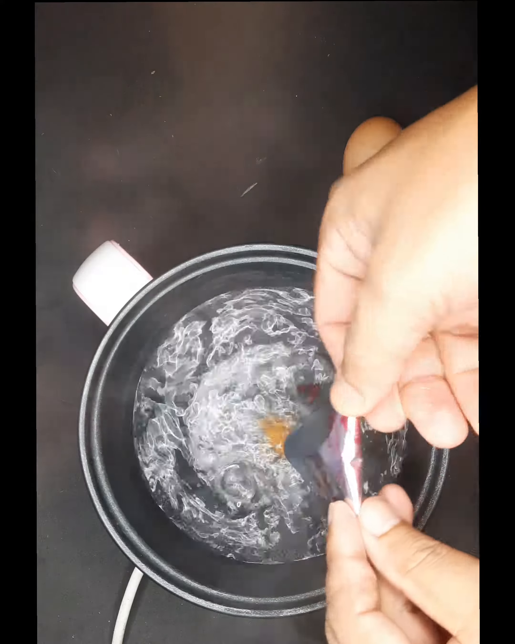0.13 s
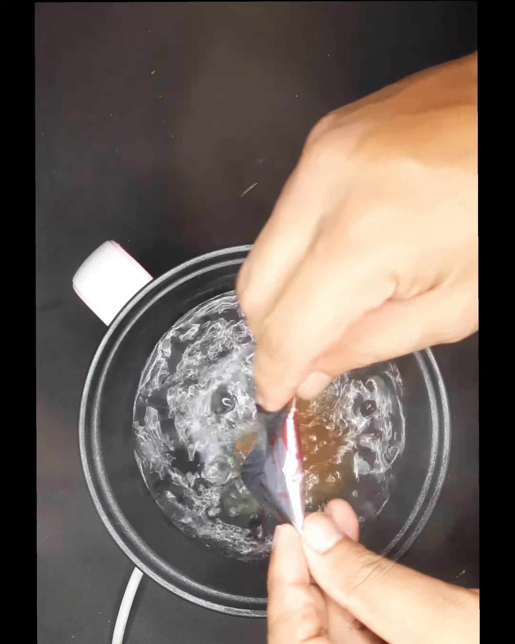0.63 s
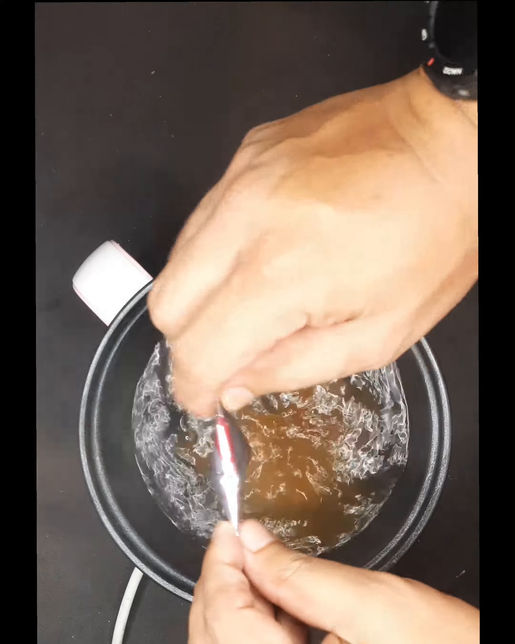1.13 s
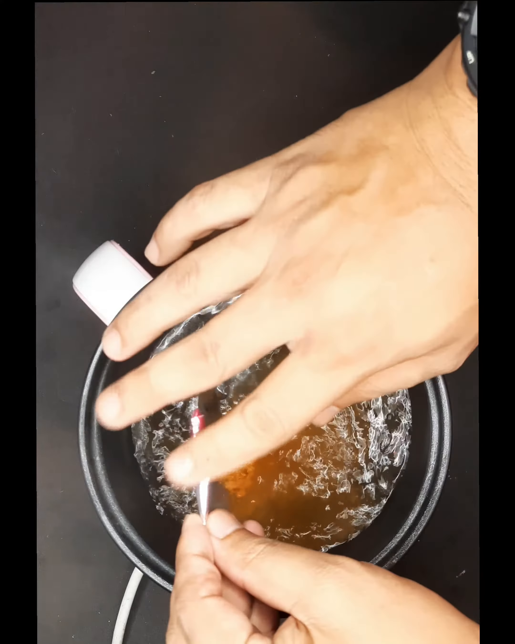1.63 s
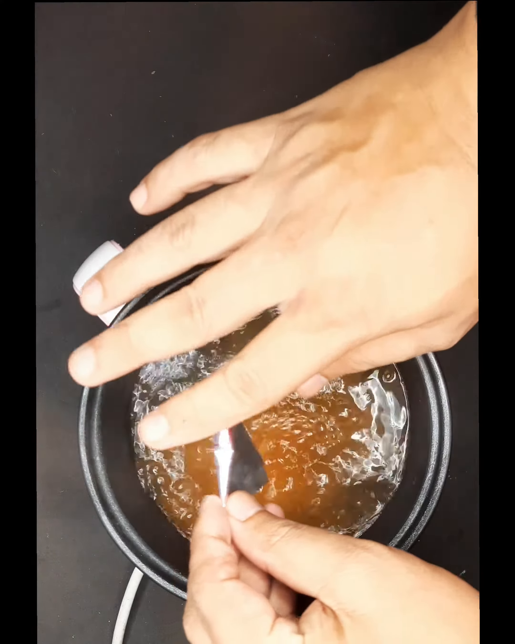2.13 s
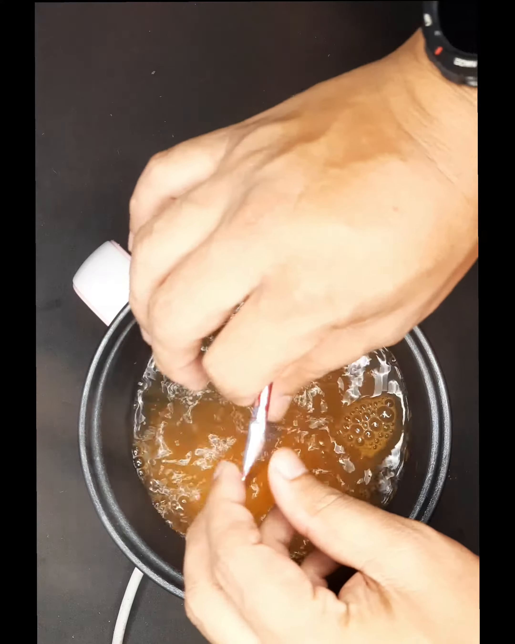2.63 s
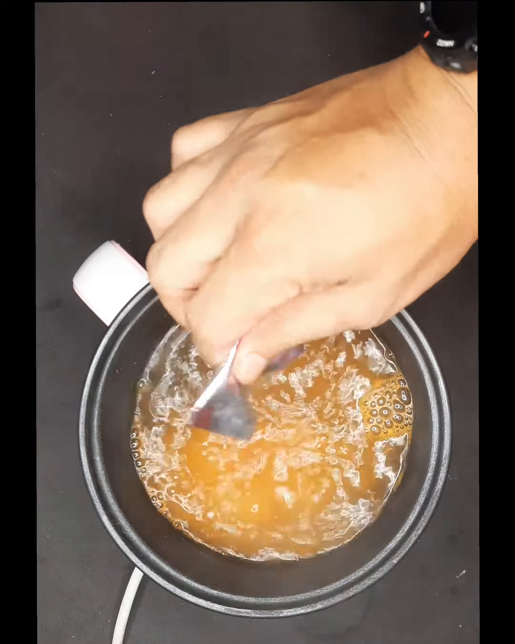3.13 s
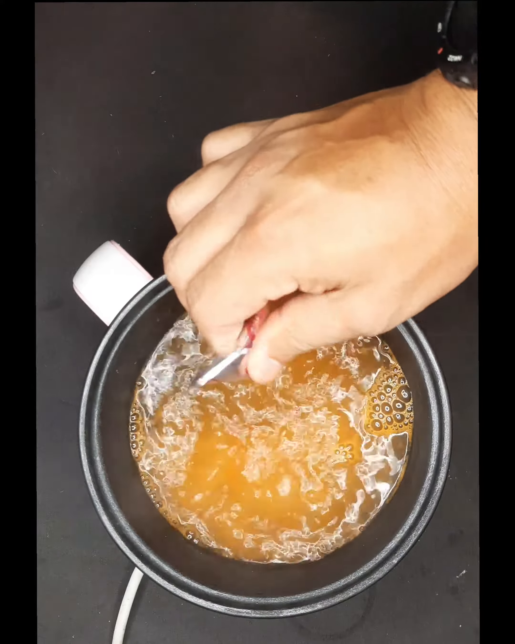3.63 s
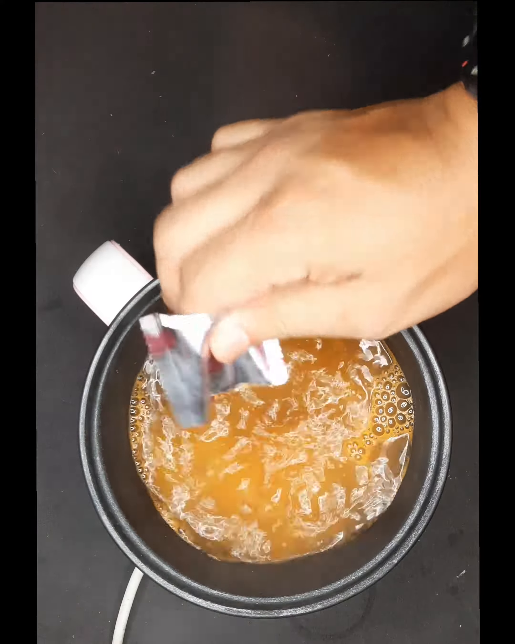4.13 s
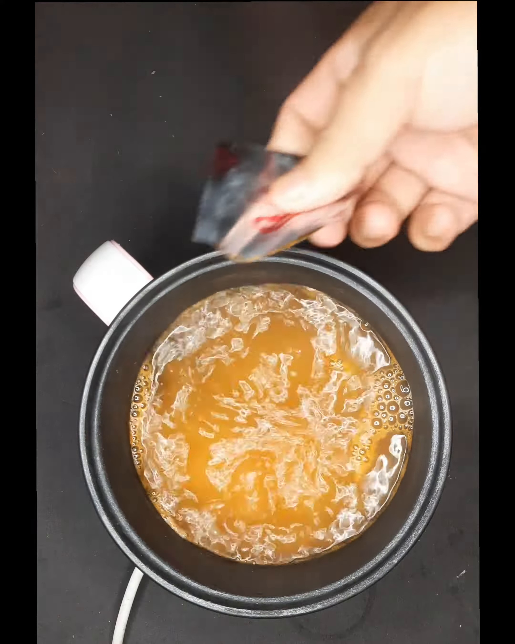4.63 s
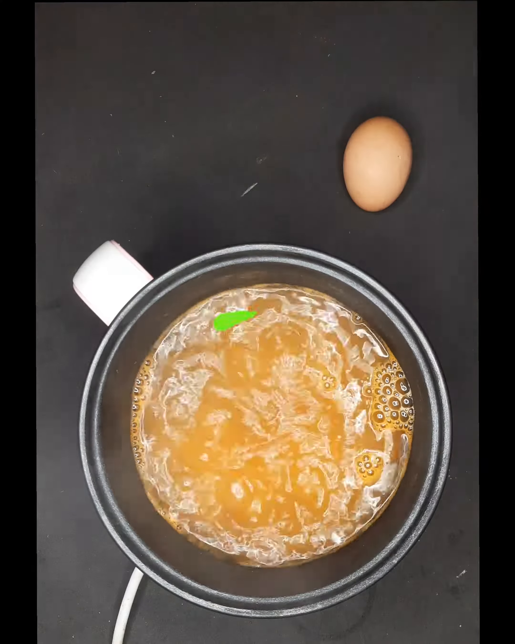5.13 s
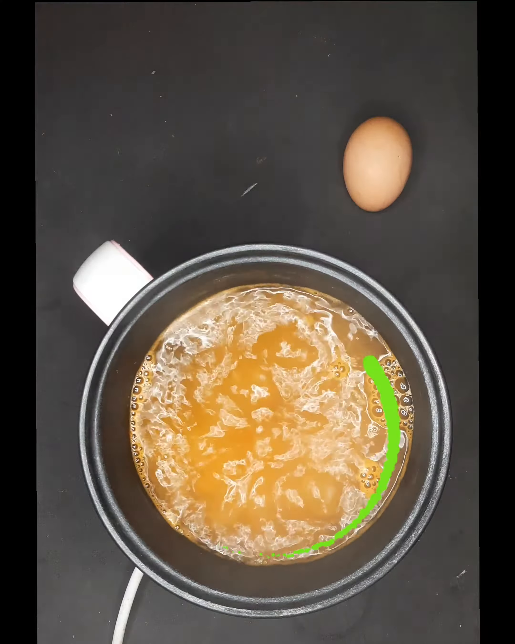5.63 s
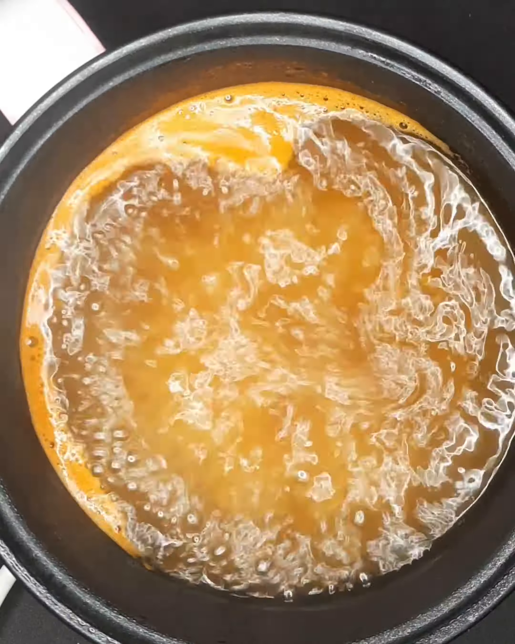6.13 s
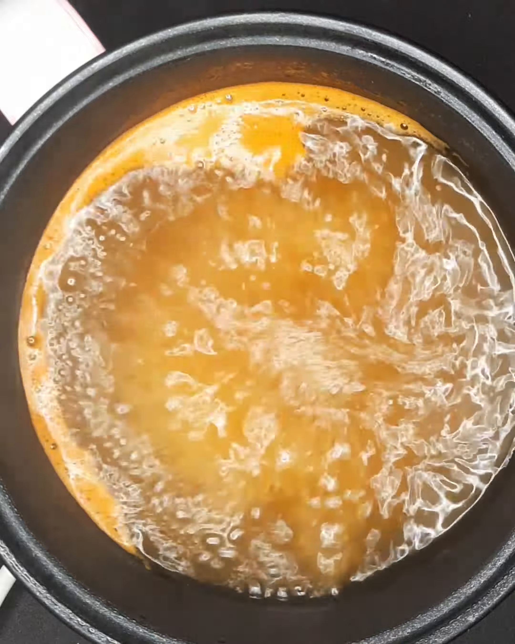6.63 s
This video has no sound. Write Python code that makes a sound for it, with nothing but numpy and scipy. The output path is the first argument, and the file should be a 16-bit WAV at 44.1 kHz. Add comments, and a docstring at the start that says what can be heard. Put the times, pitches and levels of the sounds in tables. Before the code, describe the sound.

A small pot of water boils throughout, close and dry in a kitchen: a soft broad seethe, low hum, small rounded plops and occasional hollow pops. For the first 0.6 seconds it is nearly alone. Light foil snaps then begin, gathering into duller, grainy shakes of a full sachet from 1.2 to 2.1 seconds. A sharp squeeze comes near 2.5, and from 2.7 to 3.9 the foil crackles densely, bright and loud, with hollow pops beneath and low steam puffs buffeting left and right. Further crisp bursts come at about 4.2 and 4.5, then the foil stops. Bubbling continues with only faint ticks until 5.96. Complete silence lasts about a tenth of a second. From 6.07 to the end near 6.8 the boil returns, with finer, nearer foil rustling toward the left, peaking around 6.45 and 6.6, and a few soft puffs.

```python
"""A foil sachet is shaken, squeezed and crinkled above a small electric pot of boiling water.
Foil: noise bursts for single snaps, plus a dense click crackle gated by each squeeze.
Pot: seething noise, resonances struck by collapsing bubbles, damped sines for hollow pops and plops, low hum.
Steam buffets the two microphone ports as low-frequency noise puffs.
After a short silence the microphone is nearer and more foil rustles at the left."""
import sys
import numpy as np
from scipy import signal
from scipy.fft import rfft, irfft, next_fast_len
from scipy.io import wavfile
from scipy.ndimage import uniform_filter1d, map_coordinates

SR = 44100
rng = np.random.default_rng(int(sys.argv[2]) if len(sys.argv) > 2 else 0)


def nominal_scale(level):
    """Amplitude ratio for a level in decibels (scalar or array-like)."""
    x = np.asarray(level, float) / 20
    return 10 ** x


def digitize_waveform(pressure):
    """Quantize a signal to 16-bit integers and store it at the path in sys.argv[1].

    Rows of a 2-D input are taken as channels; values are limited to [-1, 1].
    """
    field = np.atleast_2d(pressure).T
    bounded = np.clip(field, -1, 1)
    quanta = np.round(bounded * 32767).astype(np.int16)
    wavfile.write(sys.argv[1], SR, quanta)


N = 298116

# dropout: start_s, end_s
SILENCE_S = (5.957, 6.071)
# boiling wash in 250-1200 Hz, one list each side of the silence: time_s, level_db
BOIL_LEVEL = [
    [(0.0, -50), (5.74, -50.5), (5.99, -47)],
    [(6.05, -51.5), (6.28, -51.5), (6.76, -47)],
]
# spectrum of the wash: freq_hz, density_db_per_hz
SEETHE_SPECTRUM = [(21, -28), (35, -19.5), (65, -9), (111, -12.5), (136, -19.5), (171, -12), (245, -17),
                   (342, -4.5), (379, -11.5), (840, -19.5), (1300, -20), (2220, -19), (2650, -26),
                   (3600, -30.5), (4700, -34.5), (7200, -34.5), (9000, -42.5), (14800, -42.5),
                   (16000, -61.5)]
# resonances of pot and water, before the room: freq_hz, width_hz, level_db
POT_MODES = [(102.7, 4.8, -58), (344.8, 10, -60.5), (658, 370, -76), (860, 133, -53.5)]
# low hollow pops near the pot's air resonance, from bubbles or set off by foil snaps,
# before the room: time_s, level_db, start_pitch_hz
HOLLOW_POPS = [(1.61, -29, 604), (2.019, -25.5, 820), (2.407, -24.5, 860), (2.608, -27, 800),
               (2.72, -28, 513), (2.84, -36, 890), (2.93, -23.5, 880), (3.082, -30, 882),
               (3.145, -24.5, 860), (3.205, -26, 794), (3.267, -24, 850), (3.321, -23.5, 935),
               (3.415, -28, 930), (3.462, -18.5, 890), (3.519, -22.5, 895), (4.659, -25.5, 770),
               (5.351, -29.5, 844), (5.447, -29, 786), (5.618, -29, 750)]
# wavering low tones: freq_hz, mid_level_db
HUM_TONES = [(59.2, -54.5), (168, -57)]
# steam puffs on the ports: time_s, left_db, right_db, half_span_ms
STEAM_PUFFS = [(2.052, -57, -29.5, 24), (2.093, -32, -29.5, 36), (2.205, -57, -32, 49),
               (2.35, -35, -40.5, 39), (2.439, -32, -58, 32), (2.479, -29, -53, 13),
               (2.522, -24, -47.5, 18), (2.6, -35.5, -38, 37), (2.663, -39.5, -32.5, 21),
               (2.698, -36, -24.5, 95), (2.763, -30.5, -26, 17), (2.812, -54.5, -16.5, 62),
               (2.874, -48, -27.5, 14), (2.915, -30.5, -29.5, 40), (3.36, -40, -34, 51),
               (4.441, -54, -36.5, 65), (4.563, -42, -30, 30), (6.348, -41, -45, 90),
               (6.414, -32, -39.5, 19), (6.537, -52.5, -35, 22), (6.656, -30.5, -31, 26)]
# spectrum of a puff: freq_hz, density_db_per_hz
PUFF_SPECTRUM = [(30, -9), (80, 0), (150, -11), (230, -19), (400, -49)]
# foil creases that snap: time_s, level_db, body_over_level_db, top_over_level_db
FOIL_SNAPS = [(0.6545, -40, 1.5, -6.5), (0.6895, -49, -2, -7), (0.714, -41.5, -6, -5),
              (0.958, -43.5, -2, -4), (0.968, -46.5, 1, 0), (1.0851, -49, 10, -3), (1.104, -47, 2, 0.5),
              (1.159, -39, -2.5, -7), (1.174, -43, -3, -8), (1.275, -50.5, 11.5, -9), (1.3, -35.5, 3, -4),
              (1.323, -37, -3, -19), (1.424, -41.5, 1, 2.5), (1.45, -31.5, -17, -8), (1.474, -44, -2.5, -9),
              (1.55, -45, 2, -2), (1.566, -37, 9.5, 3.5), (1.5809, -31, 8, 7), (1.6, -34.5, -8, -6),
              (1.625, -46, -13, 4.5), (1.679, -48.5, 0, -13), (1.693, -45.5, 10, -9), (1.707, -45, 1, -6),
              (1.775, -50.5, 1, -2), (1.784, -40, 6.5, 1), (1.809, -39, 2, -1), (1.879, -44, -10, -9),
              (1.8884, -31, -20, -7.5), (1.9278, -30.5, -2, -17), (1.965, -29, -13, -4.5),
              (2.035, -48.5, -11, -10.5), (2.111, -46.5, -2, -11), (2.12, -43, -10, 6.5),
              (2.477, -33.5, -4, -5.5), (2.4843, -49, -15, 4.5), (2.5442, -28, -8.5, -16),
              (2.594, -43, -2, -3.5), (2.659, -37, 7, 1), (2.685, -39, 5.5, -1.5), (2.6981, -38, 0.5, 9),
              (2.737, -38, 2, -1), (2.786, -45.5, 3.5, -4), (2.8, -39, 2, -5.5), (2.8163, -35, 7.5, 8),
              (2.833, -35, 1, 0), (2.843, -28.5, -9, -1), (2.859, -31, 2, 6.5), (2.8726, -27, -11, 6.5),
              (2.882, -27, -6.5, 8), (2.9095, -28.5, -26, -1.5), (2.954, -26.5, -2, 5.5),
              (2.9913, -26.5, -12.5, -3), (2.9966, -33, -23, 8), (3.009, -24, 0, 0), (3.0227, -35, 9, 5),
              (3.055, -33.5, -3.5, 16.5), (3.0642, -32, 1.5, -3), (3.078, -23, -3.5, 7),
              (3.123, -38, -12.5, 7), (3.14, -27, -2.5, -2), (3.168, -38.5, 0.5, -4.5),
              (3.184, -26.5, -8.5, 3.5), (3.203, -26, -10, 7.5), (3.207, -21, -21, 3),
              (3.226, -22, -18, -6), (3.228, -22, -25.5, 3.5), (3.237, -23.5, -15.5, 2.5),
              (3.2685, -28.5, 3.5, -0.5), (3.301, -36, -1, -5), (3.3242, -30.5, 0.5, 2),
              (3.334, -30, -7.5, 2.5), (3.383, -39, 4.5, -4.5), (3.4047, -38.5, -3, 3),
              (3.415, -36, 0.5, 2.5), (3.425, -36, 8, 0.5), (3.4336, -30.5, 4.5, 8.5),
              (3.442, -27, -14.5, 3), (3.447, -27.5, -9, 8), (3.463, -33.5, -2, 16),
              (3.4796, -29, -3, 10.5), (3.504, -41, 12, 4), (3.517, -36, 2.5, 10), (3.5407, -31, -13, 3),
              (3.5533, -32, -1, 4), (3.5586, -25, 4.5, -6), (3.566, -27.5, -4, -0.5), (3.577, -27, -12, 7),
              (3.582, -23, -13, -3), (3.595, -25, -19, 3), (3.6074, -29.5, -7, 3), (3.622, -38.5, -8, 1),
              (3.642, -45, -12, -5), (3.668, -38.5, -25, 5), (3.7038, -33, -3, -0.5), (3.71, -27, -4, 2.5),
              (3.7329, -26.5, 4.5, 3), (3.75, -27.5, -5.5, -10), (3.789, -27, -6, 4.5),
              (3.8358, -36, -0.5, 11.5), (3.851, -34, -2, 0.5), (3.8692, -34, -9, 5),
              (3.9035, -30.5, -15, -1), (3.909, -26, -9, -3), (3.937, -35.5, -26, 11),
              (4.1199, -32.5, 0, 2.5), (4.147, -32.5, 1.5, 6), (4.157, -38.5, -20, -3.5),
              (4.1848, -31, -7, -2), (4.1917, -22, -23, 5.5), (4.224, -30, -11, 4.5),
              (4.2414, -35.5, 0, 0.5), (4.2863, -47, -12, -6), (4.416, -34.5, -31, -36),
              (4.431, -32.5, -13.5, -32), (4.442, -36, -10, -15), (4.4783, -23.5, -34, 4),
              (4.7985, -53.5, 4, 4), (4.857, -48.5, -15, -10), (5.087, -43.5, -12, 3.5),
              (5.338, -43, -9, -14), (5.359, -42.5, -14, 4.5), (5.4247, -46.5, -1, -19),
              (5.484, -44.5, 1, -12), (5.5368, -55, 12.5, -19), (6.107, -49.5, -1, 3),
              (6.1568, -44, 11, -8), (6.176, -47, 11.5, -8), (6.184, -35, -5, -13), (6.208, -40, -1, 1.5),
              (6.222, -43.5, 15, -2), (6.2432, -40.5, 12, 5), (6.2623, -43, -8, -4), (6.284, -36, 7.5, 3),
              (6.336, -35.5, 3, 2), (6.344, -33, -9, -2), (6.366, -35, -1, 1.5), (6.4067, -39, 2, 12),
              (6.436, -29, -19, 5.5), (6.519, -37, -3, -4), (6.5238, -40, 4, 4), (6.5648, -41, -16, 17),
              (6.573, -37.5, -2, 13), (6.589, -36.5, 9.5, 0), (6.63, -34, -8, -2.5),
              (6.6733, -28.5, -3.5, -12)]
# spectrum of the foil: freq_hz, density_db_per_hz
FOIL_SPECTRUM = [(350, -1.5), (600, -4.5), (894, 3), (1130, -1.5), (1680, -5.5), (2610, 2), (3430, -4),
                 (5480, 2), (7410, -3), (12500, -3.5), (15400, -6.5), (16300, -38.5)]
# spectrum of the nearer crackle: freq_hz, density_db_per_hz
NEAR_FOIL_SPECTRUM = [(350, 4), (800, -5.5), (1500, 1.5), (2680, 3), (5710, -0.5), (9620, -4),
                      (11200, -2.5), (15400, -9), (16000, -30)]
# shakes and squeezes of the sachet: peak_s, peak_db, length_ms (between points 20 dB down)
SACHET_SQUEEZES = [(1.17, -53.5, 250), (1.436, -40, 165), (1.577, -40.5, 149), (1.699, -38, 73),
                   (1.804, -39, 56), (1.895, -41, 99), (1.96, -43, 166), (2.485, -29, 47),
                   (2.544, -40.5, 117), (2.691, -39, 144), (2.833, -28, 163.5), (2.96, -29, 114),
                   (3.0, -35, 111), (3.078, -29, 130.5), (3.145, -34, 62), (3.219, -27, 120),
                   (3.327, -30.5, 132), (3.45, -30, 218), (3.591, -27.5, 113), (3.738, -32, 132),
                   (3.798, -28, 66.5), (3.855, -29, 57.5), (3.905, -31.5, 114.5), (4.189, -25.5, 87),
                   (4.239, -35.5, 66), (4.429, -57, 85), (4.481, -29.5, 54), (5.363, -50, 155),
                   (5.5, -52, 80)]
# how hard the nearer foil is worked: time_s, level_db
NEAR_FOIL_LEVEL = [(6.072, -45), (6.16, -54), (6.24, -39), (6.445, -31), (6.458, -42), (6.51, -49.5),
                   (6.53, -48.5), (6.6, -34.5), (6.673, -40), (6.7, -48.5), (6.76, -58)]
# dull part of the crackle, strongest while the sachet is full: time_s, gain_db
DULL_GAIN = [(0, 7), (2.2, 4.5), (2.6, 1), (4.6, -0.5), (6.76, 3.5)]
# likeness of left and right in the wash: freq_hz, correlation
PORT_LIKENESS = [(60, 0.57), (180, 0.96), (550, 0.77), (1650, -0.045), (4970, -0.035), (15000, -0.072)]
# colour of the two ports: freq_hz, left_over_right_db
PORT_COLOUR = [(60, 0), (180, 0), (550, 3), (1650, 3), (4970, -1), (15000, 7)]
# decay of the kitchen: freq_hz, t60_s
KITCHEN_DECAY = [(500, 0.096), (4000, 0.076), (14000, 0.056)]

SILENCE_FROM_S, SILENCE_TO_S = SILENCE_S
COLLAPSE_TOP_HZ = 2480  # pole frequency of a two-pole roll-off: collapse under water
PLOP_COUNT, PLOP_MEDIAN_HZ, PLOP_LOG_SPREAD = 180, 804, 0.15
PLOP_MEDIAN_DB, PLOP_SPREAD_DB = -44.5, 4.5
SNAP_MEDIAN_MS, NEAR_SNAP_MEDIAN_MS, SNAP_LOG_SPREAD = 3.75, 1.78, 0.13  # nominal length
SNAP_LEAD_S = 0.005  # bending before the crease gives
FULL_UNTIL_S, FULL_BODY_HZ = 2.3, (2300, 3060)  # full sachet: narrower body band
KNOCK_MEDIAN_DB, KNOCK_SPREAD_DB = -13.5, 4.2  # low knock of a snap, over its body
RISE_SHARE = 0.31  # part of a squeeze spent rising


def unit(x):
    """Scaled to rms 1."""
    return x / np.sqrt(np.mean(x ** 2) + 1e-20)


def along(points, hz):
    """(Hz, value) points interpolated on a log frequency axis."""
    f, v = np.transpose(points)
    return np.interp(np.log(hz + 1), np.log(f + 1), v)


def curve(rows, column, outside=-120):
    """One value per sample from one column of a table."""
    rows = np.array(rows)
    return np.interp(np.arange(N) / SR, rows[:, 0], rows[:, column], outside, outside)


def wobble(knots_per_s):
    """Smooth random curve."""
    knots = rng.standard_normal(int(N * knots_per_s / SR) + 4)
    return map_coordinates(knots, [np.arange(N) * knots_per_s / SR])


def filtered(x, response):
    """x times a complex response of frequency."""
    m = next_fast_len(N + 8192)
    return irfft(rfft(x, m) * response(np.fft.rfftfreq(m, 1 / SR)), m)[..., :N]


def pair(gain, patchy_db):
    """Stereo noise, mid rms 1, with time-frequency patches of random gain and set port likeness."""
    z = signal.stft(rng.standard_normal((2, N)), nperseg=512)[2]
    field = uniform_filter1d(rng.standard_normal(z.shape[1:]), size=4, axis=0)
    field = uniform_filter1d(field, size=8, axis=1)
    two = signal.istft(z * nominal_scale(patchy_db * unit(field)), nperseg=512)[1][:, :N]

    def split(hz):
        # cos(2 * angle) is the left-right correlation
        angle = np.arccos(np.clip(along(PORT_LIKENESS, hz), -1, 1)) / 2
        return gain(hz) * np.array([np.cos(angle), np.sin(angle)])

    mid, side = filtered(two, split)
    return np.array([mid + side, mid - side]) / np.sqrt(np.mean(mid ** 2))


def twin(count, alike):
    """Noise for the two ports, partly shared."""
    shared, left, right = rng.standard_normal((3, count))
    return np.sqrt(alike) * shared + np.sqrt(1 - alike) * np.array([left, right])


def grains(s, hz, cycles, size, rise, length):
    """Damped sines whose pitch rises as they die, summed at their times."""
    t = np.arange(length) / SR
    hz = hz[:, None]
    life = t * hz / cycles
    envelope = size[:, None] * np.exp(-life) * (1 - np.exp(-8 * life))
    wave = envelope * np.sin(2 * np.pi * hz * t * (1 + rise * life))
    at = (s * SR).astype(int)[:, None] + np.arange(length)
    return np.bincount(at.ravel(), wave.ravel(), N + length)[:N]


def room(x, delay_s, share_db):
    """Direct sound, later at the right port, plus wall decay that differs at each port."""
    hz, t, z = signal.stft(rng.standard_normal((2, SR // 3)), SR, nperseg=128)
    decay = nominal_scale(-60 * t / along(KITCHEN_DECAY, hz)[:, None])
    tail = signal.istft(z * decay, SR, nperseg=128)[1]
    wet = signal.fftconvolve(x, tail / np.linalg.norm(tail[0]), axes=1)[:, :N]
    direct = filtered(x, lambda f: np.exp(-2j * np.pi * f * [[0], [delay_s]]))
    return direct + nominal_scale(share_db) * wet


def hum():
    """Low sines with wandering level and phase."""
    t, out = np.arange(N) / SR, np.zeros(N)
    for hz, db in HUM_TONES:
        phase = 2 * np.pi * hz * t + 1.1 * wobble(8.2)
        out += np.sqrt(2) * nominal_scale(db + 2.5 * wobble(4)) * np.sin(phase)
    return out


def wash():
    """Seething of the water: patchy coloured noise that follows the boil level."""
    level_db = np.maximum(curve(BOIL_LEVEL[0], column=1), curve(BOIL_LEVEL[1], column=1))
    shape = pair(lambda hz: nominal_scale(along(SEETHE_SPECTRUM, hz)), patchy_db=2.0)
    band = filtered(shape.mean(0), lambda hz: (hz > 250) & (hz < 1200))
    return nominal_scale(level_db) * shape / np.std(band)


def pot_knocks():
    """Collapsing bubbles: each blow excites all pot resonances at once."""
    hits = rng.random(N) < 450 / SR * nominal_scale(2.2 * wobble(14))  # about 450 per s
    blows = hits * rng.standard_normal(N) * nominal_scale(1.6 * rng.standard_normal(N))
    out = np.zeros(N)
    for centre, width, db in POT_MODES:
        def mode(f):
            resonance = 1j * f * width / (centre ** 2 - f ** 2 + 1j * f * width)
            return resonance / (1 + 1j * f / COLLAPSE_TOP_HZ) ** 2
        out += nominal_scale(db) * unit(filtered(blows, mode))
    return out


def hollow_pops():
    """Low hollow pops near the pot's air resonance: damped sines of slightly rising pitch."""
    s, db, hz = np.transpose(HOLLOW_POPS)
    return grains(s - 0.002, hz, cycles=1.55, size=nominal_scale(db), rise=0.033, length=3000)


def plops():
    """Small bubbles at random times: damped sines of scattered, rising pitch."""
    when_s = rng.random(PLOP_COUNT) * N / SR
    pitch, size = rng.standard_normal((2, PLOP_COUNT))
    plop_hz = PLOP_MEDIAN_HZ * np.exp(PLOP_LOG_SPREAD * pitch)
    plop_size = nominal_scale(PLOP_MEDIAN_DB + PLOP_SPREAD_DB * size)
    return grains(when_s, plop_hz, cycles=3.58, size=plop_size, rise=0.076, length=2000)


def pot():
    """Wash and hum direct; knocks, hollow pops and plops through the room."""
    struck = np.tile(pot_knocks() + hollow_pops() + plops(), (2, 1))
    return wash() + hum() + room(struck, delay_s=0.00028, share_db=-7.5)


def steam():
    """Each puff is a short low eddy, unrelated at the two ports."""
    flow = filtered(rng.standard_normal((2, N)), lambda hz: nominal_scale(along(PUFF_SPECTRUM, hz)))
    out = np.zeros((2, N))
    for s, left_db, right_db, ms in STEAM_PUFFS:
        span = slice(round((s - ms / 1000) * SR), round((s + ms / 1000) * SR))
        eddy = flow[:, span] * np.hanning(flow[:, span].shape[1])
        eddy /= np.abs(eddy).max(axis=1, keepdims=True)
        out[:, span] += nominal_scale(np.array([[left_db], [right_db]])) * np.sqrt(2) * eddy
    return out


def crackle(tone, rate, spread_db, clump_db):
    """Tiny creases: clumped clicks of uneven size, some dull and some bright; rms 1."""
    busy = rate / SR * nominal_scale(clump_db * wobble(70))
    ticks = (rng.random((2, N)) < busy) * nominal_scale(spread_db * rng.standard_normal((2, N)))
    dull, bright = (signal.lfilter([1], [1, -0.89], row) * twin(N, alike=0.38) for row in ticks)

    def low(f):
        return 1 / (1 + (f / 4200) ** 4)

    dull_part = nominal_scale(curve(DULL_GAIN, column=1)) * filtered(dull, lambda f: np.sqrt(low(f)))
    bright_part = filtered(bright + 0.083 * dull, lambda f: np.sqrt(1 - low(f)))
    return unit(filtered(dull_part + bright_part, lambda f: nominal_scale(along(tone, f))))


def squeezing():
    """Crackle gain: every squeeze swells quickly and lets go slower, exponentially both ways."""
    t, power = np.arange(N) / SR, np.zeros(N)
    for s, db, ms in SACHET_SQUEEZES:
        near = slice(round((s - 0.3) * SR), round((s + 0.4) * SR))
        before, after = (s - t[near]) / RISE_SHARE, (t[near] - s) / (1 - RISE_SHARE)
        away = np.maximum(before, after) * 1000 / ms
        power[near] += nominal_scale(2 * (db - 20 * away))
    return np.sqrt(power)


def snap(median_ms):
    """One crease: a faint tick as it bends, a burst as it runs, then a rattling decay."""
    t = np.arange(1500) / SR
    ms = median_ms * np.exp(SNAP_LOG_SPREAD * rng.standard_normal())
    age = np.maximum(t - SNAP_LEAD_S, 0) / (0.12 * ms / 1000)
    strain = 0.12 * np.sin(np.pi * np.minimum(t / (2 * SNAP_LEAD_S), 1))
    run = (age / 3) ** 3 * np.exp(3 - age)
    rattle = 0.12 * (1 - np.exp(-age)) * np.exp(-age / 14.0)
    burst = strain + run + rattle
    noise = twin(len(t), alike=0.33)
    turn = 2 * np.pi * rng.uniform(1700, 17300) / SR  # each facet favours its own pitch
    ring = signal.lfilter([1], [1, -2 * 0.9 * np.cos(turn), 0.9 ** 2], noise)
    sound = burst * (noise + 0.35 * unit(ring))
    return sound * np.linalg.norm(burst) * np.sqrt(2) / np.linalg.norm(sound)


def snaps():
    """Snaps summed into body, middle, top and low-knock bands, each coloured by the foil."""
    edges_hz = [(1950, 3500), FULL_BODY_HZ, (3500, 9000), (9000, 17000), (500, 1400)]
    bands = np.zeros((5, 2, N + SR))
    for s, db, body_db, top_db in FOIL_SNAPS:
        sound = snap(NEAR_SNAP_MEDIAN_MS if s > SILENCE_TO_S else SNAP_MEDIAN_MS)
        start = round((s - 0.0011 - SNAP_LEAD_S) * SR)
        span = slice(start, start + sound.shape[1])
        gains = nominal_scale(db + np.array([body_db, 0, top_db]))[:, None, None]
        bands[[int(s < FULL_UNTIL_S), 2, 3], :, span] += gains * sound
        if s < SILENCE_FROM_S:
            knock = nominal_scale(KNOCK_MEDIAN_DB + KNOCK_SPREAD_DB * rng.standard_normal())
            bands[4, :, span] += knock * gains[0] * sound.mean(0)
    hz, out = np.fft.rfftfreq(4096, 1 / SR), np.zeros((2, N))
    for band, (lo, hi) in zip(bands, edges_hz):
        def colour(f):
            skirts = (1 + (lo / (f + 1)) ** 6) * (1 + (f / hi) ** 6)
            return nominal_scale(along(FOIL_SPECTRUM, f)) / np.sqrt(skirts)
        out += filtered(band[:, :N], colour) / np.sqrt(np.mean(colour(hz) ** 2))
    return out


def foil():
    """Snaps over a crackle that follows the fingers; nearer and stronger at the left after the silence."""
    single = snaps()
    far = squeezing() * crackle(FOIL_SPECTRUM, rate=1100, spread_db=6.0, clump_db=4.5)
    near = crackle(NEAR_FOIL_SPECTRUM, rate=4900, spread_db=5.5, clump_db=1.5)
    near = nominal_scale(curve(NEAR_FOIL_LEVEL, column=1)) * near
    later = np.arange(N) / SR > SILENCE_TO_S
    first = room((single + far) * ~later, delay_s=0.00012, share_db=-7.5)
    lean = nominal_scale(np.array([[2.3], [-2.3]]))
    return first + room(lean * (single + near) * later, delay_s=0.000409, share_db=-6.5)


def scene():
    """Pot, steam and sachet."""
    return pot() + steam() + foil()


def roll_off(x):
    """The treble ends steeply here."""
    return signal.sosfilt(signal.butter(12, 16660, fs=SR, output="sos"), x)


def record(dry):
    """The two ports differ in colour and lose the deepest bass; the sound drops out briefly."""
    def port(hz):
        colour = nominal_scale(along(PORT_COLOUR, hz) * [[0.5], [-0.5]])
        return colour / np.sqrt(1 + (44 / (hz + 1)) ** 6)

    t = np.arange(N) / SR
    sounding = (t < SILENCE_FROM_S) | (t > SILENCE_TO_S)
    return roll_off(filtered(dry, port) * sounding)


dry = scene()
out = record(dry)
digitize_waveform(out)
```